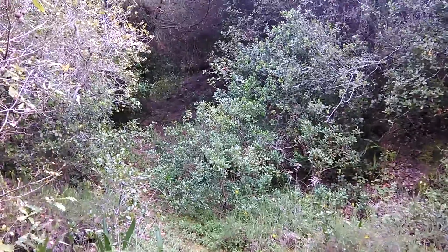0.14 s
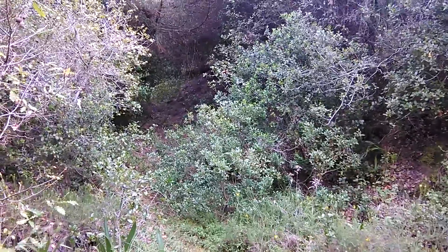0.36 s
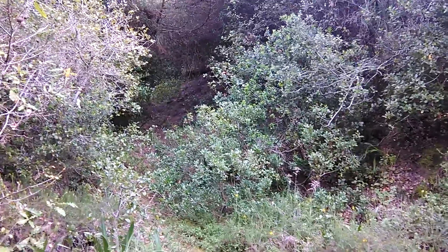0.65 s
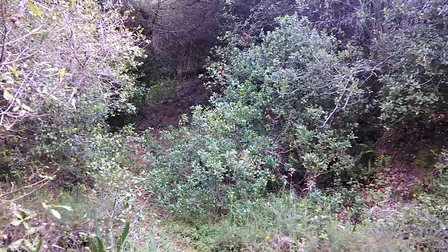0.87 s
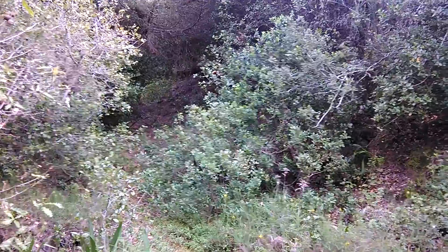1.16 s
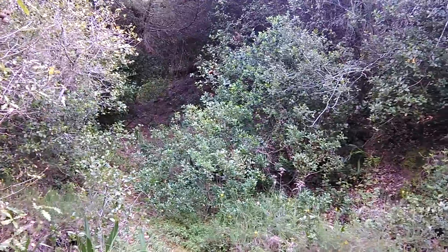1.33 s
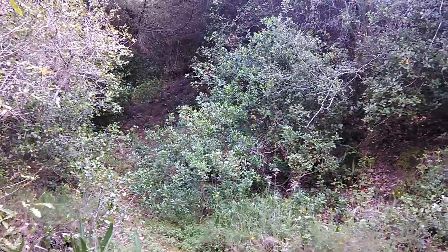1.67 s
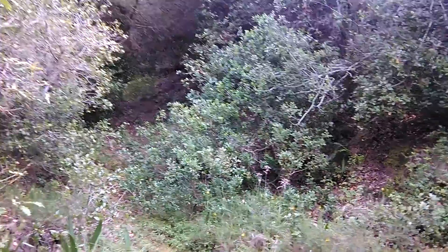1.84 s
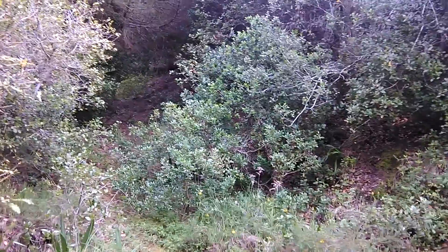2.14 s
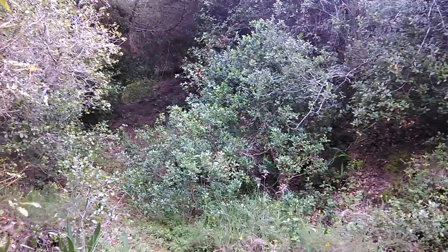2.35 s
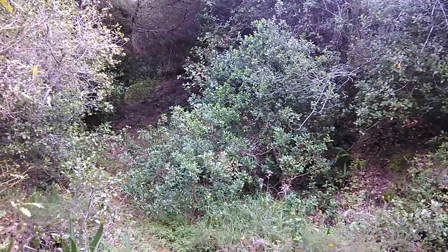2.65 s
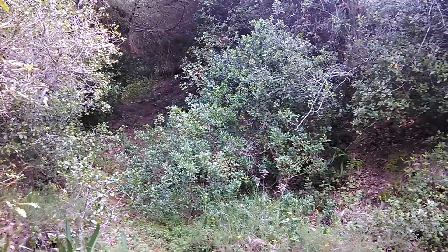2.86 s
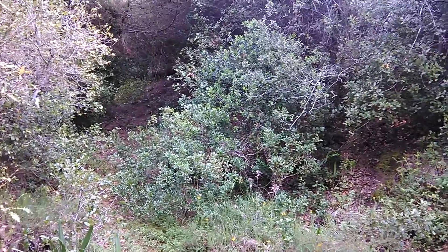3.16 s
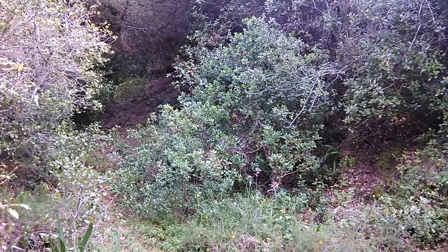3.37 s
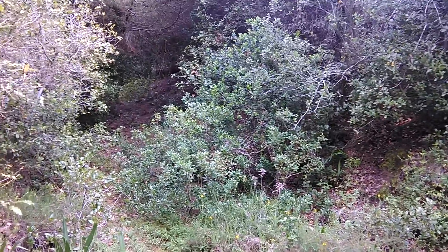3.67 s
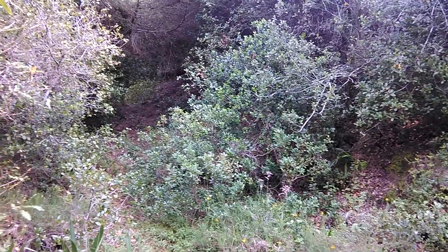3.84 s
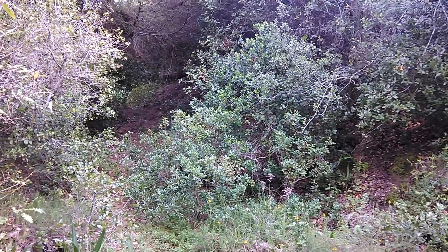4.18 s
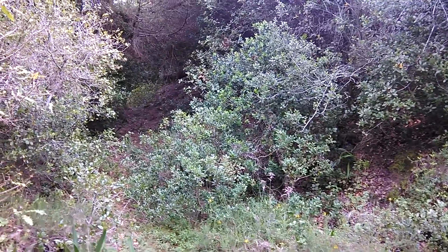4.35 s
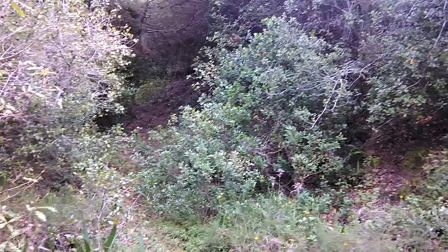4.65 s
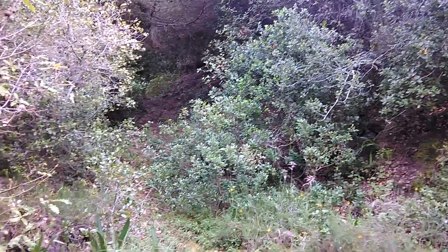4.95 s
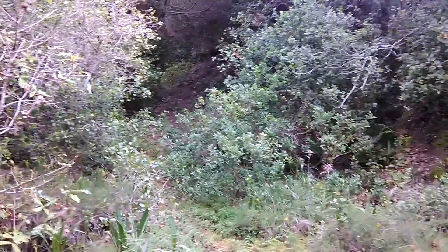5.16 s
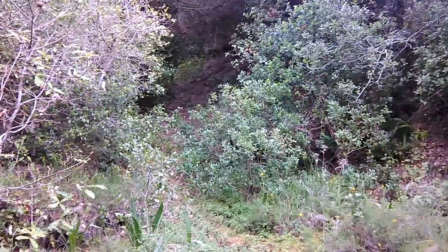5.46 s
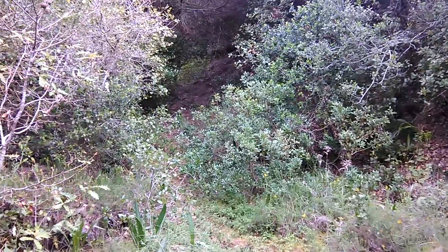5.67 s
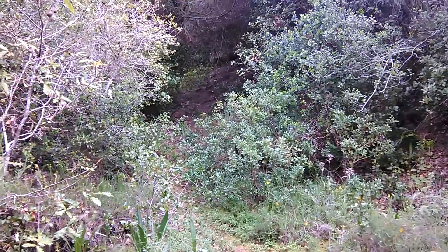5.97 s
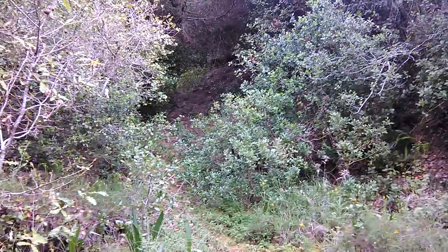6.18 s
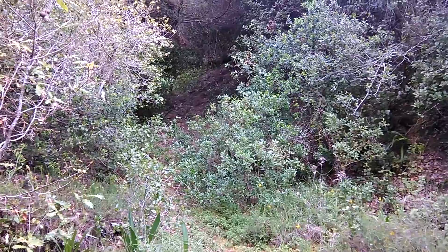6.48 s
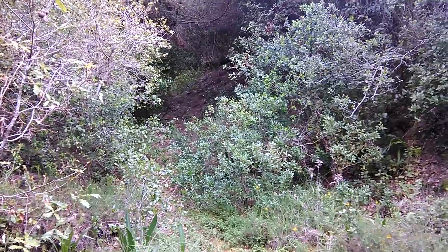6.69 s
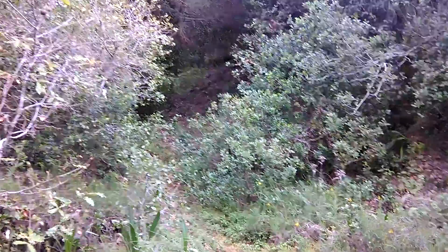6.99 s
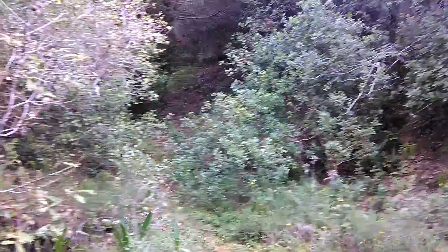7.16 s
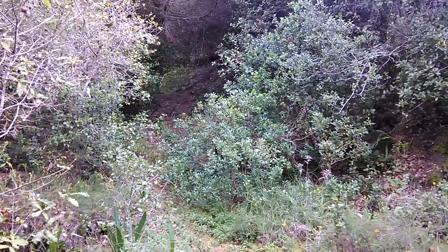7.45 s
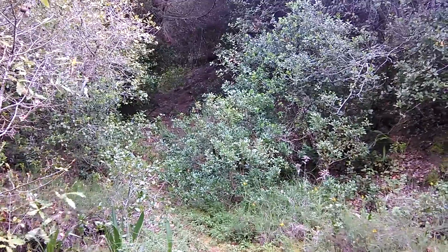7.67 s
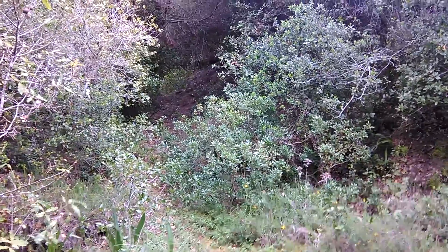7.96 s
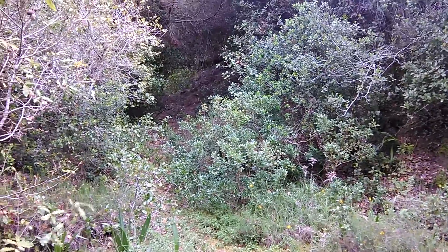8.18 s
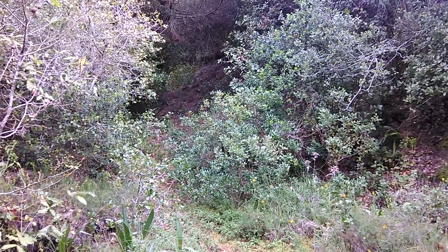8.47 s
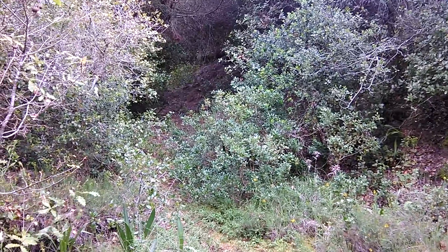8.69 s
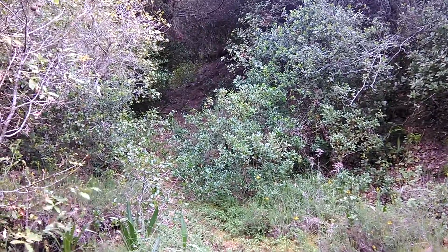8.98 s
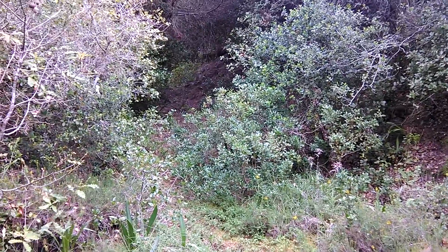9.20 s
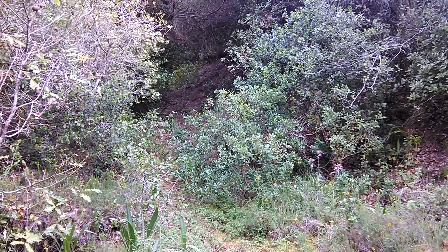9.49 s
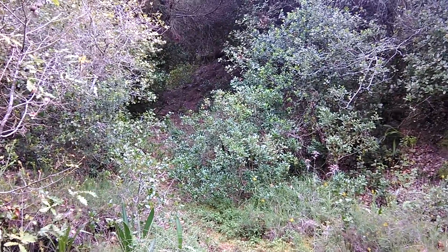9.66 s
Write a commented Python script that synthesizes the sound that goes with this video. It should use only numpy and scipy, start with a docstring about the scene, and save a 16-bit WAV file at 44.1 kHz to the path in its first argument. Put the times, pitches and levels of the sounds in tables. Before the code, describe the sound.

A quiet outdoor bed of low air rumble and faint dry-leaf hiss opens the scene, with a tiny twig tick at 0.2 s and one thin bird chirp near 0.8. Hounds start at 1.4 with a high yelp that cracks hoarse, more at 1.9, 2.4 and 2.7. From 3.2 to 5.2 short rough barks come quickly, dropping into low held tails, with yelps mixed in around 4.3 and 4.7. Barks continue in close pairs from 5.6 to 7.3, while leaves rustle nearer and twigs snap. Bushes and slope smear every call with a soft echo. Light wind bumps begin near 5.9; strong thumps arrive at 7.0 and crowd the microphone from 7.4 to 8.6, overloading dully beneath a yelp at 7.4 and barks at 7.7 and 8.2. Wind then drops, leaving clear high yelps at 8.9 and 9.3, a light rustle and fading echo until 9.8.

```python
"""Hounds call in scrub below a hillside: high yelps crack into rough half-tones, barks drop into a rasp,
and low held tails fade out behind them. Bushes and the slope scatter the calls back; one faint bird chirps.
Voices are oscillators that break into half-tones, phase jitter and noise, then pass a throat filter.
Close to the microphone, shaped noise makes leaf hiss, twig ticks and a breeze that swells into gusts;
damped low sines make the dull thumps that buffet the microphone and overload it."""
import sys
import numpy as np
from scipy import signal
from scipy.fft import rfft, irfft, next_fast_len
from scipy.io import wavfile
from scipy.ndimage import map_coordinates

SR = 44100
rng = np.random.default_rng(int(sys.argv[2]) if len(sys.argv) > 2 else 0)


def inscribe(sig):
    """Save sig as 16-bit PCM at rate SR to the path in sys.argv[1].

    A 1-D sig is mono; a 2-D sig holds one channel per row.
    Samples are clipped to [-1, 1] before scaling.
    """
    pcm = np.round(np.clip(np.atleast_2d(sig).T, -1, 1) * 32767)
    wavfile.write(sys.argv[1], SR, pcm.astype(np.int16))


N = 433503
TIME = np.arange(N) / SR


def undb(db):
    """Decibels to gain."""
    return 10 ** (np.asarray(db) / 20)


def unit(x):
    """Scale to rms 1."""
    return x / np.sqrt(np.mean(x ** 2) + 1e-18)


def curves(table):
    """Each column of a table joined by straight lines in time."""
    start_s, *columns = np.transpose(table)
    return [np.interp(TIME, start_s, column) for column in columns]


def colour(x, points):
    """Filter by (freq_hz, gain_db) points; the gain falls 9.5 dB per octave beyond the ends."""
    hz, db = np.transpose(points)
    size = next_fast_len(len(x) + 1024)
    octave = np.log2(np.maximum(np.fft.rfftfreq(size, 1 / SR), 1))
    outside = np.abs(octave - np.clip(octave, np.log2(hz[0]), np.log2(hz[-1])))
    gain = undb(np.interp(octave, np.log2(hz), db) - 9.5 * outside)
    return irfft(rfft(x, size) * gain, size)[:len(x)]


def band(x, hz, kind, order=2):
    """Causal low-, high- or band-pass."""
    sections = signal.butter(order, np.clip(hz, 1, .45 * SR), kind, fs=SR, output="sos")
    return signal.sosfilt(sections, x)


def wander(count, hz):
    """Smooth random curve through normal values of spread 1, drawn hz times a second."""
    place = np.arange(count) * hz / SR
    return map_coordinates(rng.standard_normal(int(place[-1]) + 3), [place], order=3, mode="nearest")


def burst(start_s, attack_s, length_s, release_s):
    """Envelope that rises over attack_s, holds until length_s after its start and dies away."""
    rise = np.clip((TIME - start_s) / attack_s, 0, 1)
    return rise * np.exp(-np.clip((TIME - start_s - length_s) / release_s, 0, 20))


def add(track, start_s, sound):
    """Mix a sound into a track at start_s."""
    start = max(int(start_s * SR), 0)
    track[start:start + len(sound)] += sound[:max(N - start, 0)]


# high yelps: start_s, length_s, crest_s (start to pitch crest), break_s (start to voice break),
# crest_hz, last_hz, level_db (once broken, before the swell), roughness (clipped to 0-1),
# brightness_db (tilt per octave around 1400 Hz), mouth_hz (resonance), upper_hz (throat resonance)
YELP_CALLS = [(1.384, 0.14, 0.043, 0.06, 1410, 1137, -32, 1.11, -3, 1100, 2680),
              (1.929, .105, 0.0192, 0.04, 1497, 1284, -35, 1.17, -1, 1800, 3030),
              (2.38, 0.15, 0.043, 0.036, 1353, 1195, -43, .55, -5, 1000, 2700),
              (2.707, .12, 0.06, 0.065, 1420, 1472, -37, 0.73, -3, 1600, 2850),
              (4.265, 0.077, 0.017, 0.011, 1490, 1189, -37, .7, 2, 1420, 3300),
              (4.683, 0.12, .023, 0.0045, 1597, 1230, -38, 0.89, 1, 1580, 3070),
              (7.417, .135, 0.0431, 0.0414, 1597, 1272, -31.5, 0.71, 2, 1920, 3230),
              (8.71, 0.037, 0.013, 0.063, 1475, 1447, -47.5, 0.1, 28, 2880, 2920),
              (8.854, 0.17, 0.043, 0.043, 1488, 1338, -35.5, 0.89, -2, 2050, 3270),
              (9.304, 0.16, .012, 0.0019, 1564, 1335, -34, 0.94, -3.5, 1830, 3250)]
# yelp throat as it carries through the bushes: freq_hz, gain_db
YELP_LOWER_THROAT = [(300, -62), (520, -13.5), (700, -7.5), (860, 0), (1150, 7.5), (1450, 3), (1800, 2),
                     (2080, 0), (2450, -2.5)]
# the throat's top end: multiple of upper_hz, gain_db
YELP_UPPER_THROAT = [(1, 3), (1.08, -7), (1.2, -20), (1.5, -16.5), (1.85, -23), (2.4, -33)]
YELP_RISE_HZ_PER_S = 3665  # mean climb to the crest


def yelps():
    """Folds pulled tight: the pitch climbs to a crest and stays high as the voice breaks."""
    out = np.zeros(N)
    for start_s, length_s, crest_s, break_s, crest_hz, *rest, upper_hz in YELP_CALLS:
        first_hz = crest_hz - YELP_RISE_HZ_PER_S * crest_s
        row = (length_s, crest_s, break_s, first_hz, crest_hz, *rest)
        throat = list(YELP_LOWER_THROAT) + [(ratio * upper_hz, db) for ratio, db in YELP_UPPER_THROAT]
        yelp = call(row, throat, fall=.8, slope_db=-3, pure_db=-3, half_db=-4, rasp_db=-11, jitter=.052,
                    attack_s=0.042, release_s=0.043, head_db=1.5, rasp_lag_s=0.0066)
        add(out, start_s, yelp)
    return out


# barks: start_s, length_s, hold_s (start to pitch_hz), break_s (start to voice break), pitch_hz,
# level_db (once broken, before the swell), roughness (clipped to 0-1),
# brightness_db (tilt per octave around 1400 Hz), mouth_hz (resonance)
BARK_CALLS = [(3.164, .135, 0.0048, 0.0099, 1290, -37.5, 1.01, 1, 1710),
              (3.538, 0.11, 0.0052, 0.0089, 1303, -38, 0.89, 1, 1620),
              (3.768, .13, 0.018, 0.0082, 919, -45.5, 0.97, -4.5, 1720),
              (4.026, .13, 0.0049, 0.014, 1283, -37.5, 0.81, 0.5, 1300),
              (4.250, 0.15, 0.032, 0.047, 985, -42.5, 0.75, -2, 1230),
              (4.677, 0.068, .02, 0.011, 904, -49, 0.88, -6, 1000),
              (4.769, .13, 0.0056, 0.0073, 750, -40.5, 1.15, 1.5, 1720),
              (5.101, .12, .018, 0.023, 1002, -35, 0.79, 0.5, 1480),
              (5.592, 0.098, 0.0065, 0.02, 1031, -37.5, 0.7, -1, 2020),
              (5.664, 0.084, 0.0067, .005, 832, -36.5, 0.9, 1.5, 1930),
              (6.073, .11, .005, 0.042, 923, -39, 1, -1, 1980),
              (6.182, 0.072, 0.00704, 0.015, 1021, -35.5, .65, -5, 1930),
              (6.522, 0.083, 0.0051, 0.0067, 899, -41.5, 0.75, 2.5, 1870),
              (6.643, .115, .03, 0.026, 926, -35, 0.61, -3.5, 2110),
              (6.904, .15, 0.019, 0.0094, 984.6, -35.5, 0.79, -2.5, 1060),
              (7.31, .097, 0.0038, 0.0033, 883, -41, 0.68, 4.5, 1720),
              (7.741, 0.087, 0.0072, 0.015, 902, -35, 0.62, 7.5, 1690),
              (8.225, .085, 0.0074, .006, 993, -35, 0.62, 3.5, 1670),
              (8.694, 0.032, 0.0099, 0.025, 1026, -50.5, 0.25, -11, 1020)]
# bark throat as it carries through the bushes: freq_hz, gain_db
BARK_THROAT_COLOUR = [(300, -79), (470, -7.5), (600, 1), (800, 2), (1120, 7), (1400, 1.5), (1700, 5),
                      (2000, 2.5), (2350, 4.5), (2700, -3.5), (3150, -7.5), (3800, -24.5), (4800, -18),
                      (8000, -53)]
BARK_START_RATIO, BARK_END_HZ = 1.04, 575.4  # every bark starts a little sharp, drops to one low note


def barks():
    """Folds that slacken at once: the pitch drops quickly into a low rasp."""
    out = np.zeros(N)
    for start_s, length_s, hold_s, break_s, pitch_hz, *rest in BARK_CALLS:
        row = (length_s, hold_s, break_s, BARK_START_RATIO * pitch_hz, pitch_hz, BARK_END_HZ, *rest)
        # the longer the clean head holds before it breaks, the louder it is
        head_db = np.interp(break_s, [.005, .025], [-4, 5])
        bark = call(row, BARK_THROAT_COLOUR, fall=1.8, slope_db=-3.5, pure_db=-4, half_db=-5, rasp_db=-13,
                    jitter=.056, attack_s=0.014, release_s=0.023, head_db=head_db, rasp_lag_s=0.00091)
        add(out, start_s, bark)
    return out


def call(row, throat, fall, slope_db, pure_db, half_db, rasp_db, jitter,
         attack_s, release_s, head_db, rasp_lag_s):
    """One call: the folds start on a nearly pure tone, then break into doubled periods and chaos."""
    length_s, crest_s, break_s, first_hz, crest_hz, last_hz, db, rough, bright_db, mouth_hz = row
    rough = np.clip(rough, 0, 1)
    t = np.arange(int((length_s + release_s) * SR)) / SR
    count = len(t)

    to_crest = first_hz + (crest_hz - first_hz) * np.sin(np.pi / 2 * np.minimum(t / crest_s, 1))
    left = np.clip((length_s - t) / max(length_s - crest_s, .01), 0, 1)
    from_crest = last_hz + (crest_hz - last_hz) * left ** fall
    hz = np.where(t < crest_s, to_crest, from_crest)

    # half-tones enter around the break, chaos a little after
    doubled = np.clip((t - break_s) / .014 + .5, 0, 1)
    broken = np.clip((t - break_s - rasp_lag_s) / .025 + .5, 0, 1)
    clean = 1 - broken
    chaos = rough * broken
    hz = hz * (1 + .014 * wander(count, 130) + jitter * chaos * wander(count, 350))
    phase = 2 * np.pi * np.cumsum(hz) / SR

    tone, halves = 0, 0
    for k in range(1, 8):
        # overtones grow as the folds start to slap shut
        size = undb(slope_db * np.log2(k) + pure_db * clean * (k - 1) ** 2)
        flutter = undb(3 * wander(count, 80)) * (1 + .5 * chaos * wander(count, 250))
        tone = tone + size * flutter * np.sin(k * phase)
        # the half-tones lock only loosely to the main cycle
        slip = 1.3 * chaos * wander(count, 140)
        halves = halves + size * (1 + .6 * wander(count, 110)) * np.sin((k - .5) * phase + slip)

    # breath noise pulses with the folds
    rasp = unit(band(rng.standard_normal(count), 1600, "low", order=1))
    rasp *= (1 + .5 * np.cos(phase)) * undb(2.5 * wander(count, 300))
    folds = tone * (1 - .65 * chaos)
    folds = folds + rough * doubled * undb(half_db) * halves
    folds = folds + chaos * undb(rasp_db) * rasp
    mouth = band(folds, [mouth_hz / 1.136, mouth_hz * 1.085], "band", order=1)
    folds = folds + 1.73 * broken * mouth

    tilted = [(f, d + bright_db * np.clip(np.log2(f / 1400), -1, 1)) for f, d in throat]
    voice = colour(folds, tilted)
    rise = np.sin(np.pi / 2 * np.minimum(t / attack_s, 1)) ** 2
    close = np.clip((length_s + release_s - t) / (2 * release_s), 0, 1) ** 2
    return unit(voice) * rise * close * undb(db + head_db * clean)


# low held tails, most near 570 Hz: start_s, length_s, pitch_hz, level_db (before swell and fade)
LOW_TAILS = [(1.713, 0.12, 1003, -50.5), (2.4, 0.17, 575, -46.5), (2.721, 0.097, 520, -52.5),
             (3.204, 0.17, 600, -45.5), (3.605, 0.094, 606, -52.5), (3.809, 0.15, 581, -50.5),
             (4.099, 0.12, 587, -50), (4.326, 0.085, 598, -41.5), (4.789, 0.12, 558, -41.5),
             (5.155, 0.2, 562.4, -37.5), (5.698, 0.18, 568, -38.5), (6.235, 0.15, 552.7, -40.5),
             (6.55, 0.093, 592, -37.5), (6.697, 0.059, 560, -34.5), (6.968, 0.16, 563, -41.5),
             (7.343, 0.092, 577, -35.5), (7.791, 0.073, 565, -41.5), (8.267, 0.087, 544.4, -34.5)]


def held_tails():
    """Low held tails, most near 570 Hz, where a bark's falling pitch settles and fades."""
    out = np.zeros(N)
    for start_s, length_s, pitch_hz, db in LOW_TAILS:
        tail = held_tail(length_s, pitch_hz, db, sag=.031, waver=0.014, attack_s=0.019, fade_db=10.0)
        add(out, start_s, tail)
    return out


# throat colour of the low tails: freq_hz, gain_db
TAIL_THROAT_COLOUR = [(400, 5.5), (580, 18), (1150, 13.5), (1730, -7), (2320, -2.5), (2900, -23),
                      (3500, -26), (5000, -50)]


def held_tail(length_s, hz, db, sag, waver, attack_s, fade_db):
    """One held tail: overtones on a pitch that sags a little, fading with a hoarse waver."""
    t = np.arange(int((length_s + .03) * SR)) / SR
    count = len(t)
    pitch = hz * (1 + sag * (.5 - t / length_s) + waver * wander(count, 160))
    phase = 2 * np.pi * np.cumsum(pitch) / SR
    tone = 0
    for k in range(1, 8):
        flutter = undb(4.5 * wander(count, 60))
        tone = tone + flutter * np.sin(k * phase + .7 * wander(count, 110))
    swell = np.minimum(t / attack_s, 1) * np.minimum((t[-1] - t) / 0.048, 1)
    fade = undb(-fade_db * t / length_s)
    return unit(colour(tone, TAIL_THROAT_COLOUR)) * swell * fade * undb(db)


def hillside(x, near_db, near_t60, far_db, far_t60, echo_s, echo_db):
    """Nearby bushes scatter sound within milliseconds; the slope returns a soft echo and a dull tail."""
    t = np.arange(int(1.2 * SR)) / SR
    # sparse random reflections
    scatter = rng.standard_normal((3, len(t))) * (rng.random((3, len(t))) < .05)
    near = unit(scatter[0] * undb(-60 * t / near_t60) * (t > .004))
    far = unit(scatter[1] * undb(-60 * t / far_t60) * np.minimum(t / .08, 1))
    echo = unit(scatter[2] * np.exp(-np.abs(t - echo_s) / .012))
    slope = band(undb(far_db) * far + undb(echo_db) * echo, 2700, "low")
    response = undb(near_db) * near + slope
    return x + signal.fftconvolve(x, response / np.sqrt(len(t)))[:N]


# large eddies at the microphone: freq_hz, gain_db
LARGE_EDDY_COLOUR = [(15, -60), (25, -37), (48, 5.5), (75, 7.5), (118, 4), (230, -6.5), (400, -42.5),
                     (520, -67.5)]
# small eddies at the microphone: freq_hz, gain_db
SMALL_EDDY_COLOUR = [(200, 1.5), (330, 1.5), (550, -11), (1000, -29.5), (2000, -51), (6000, -58)]
# light breeze on the microphone: start_s, level_db
BREEZE_LEVEL = [(0, -51.5), (.6, -49.5), (1.3, -58), (2.9, -67), (3.6, -50.5), (4.1, -68), (5.6, -65),
                (6.0, -44), (6.3, -40), (6.6, -53.5), (7.0, -37.5), (7.38, -31.5), (7.5, -29.5),
                (8.25, -23), (8.8, -40.5), (9.2, -42.5), (9.5, -39), (9.83, -59)]
# gusts on top of it: start_s, length_s, level_db, eddy_db (small eddies relative to the large)
GUST_EVENTS = [(5.891, .035, -35, -35), (6.112, 0.082, -30.5, -24), (6.351, 0.039, -41.5, -31),
               (6.808, 0.029, -23.5, -42), (7.011, 0.065, -20.5, -22), (7.119, 0.15, -24.5, -27),
               (7.439, 0.044, -22, -14), (7.479, 0.078, -14.5, -7.5), (7.546, 0.047, -12.5, -4),
               (7.626, 0.063, -12.5, -4), (7.705, 0.05, -15.5, -9.5), (7.771, 0.026, -11, -8),
               (7.839, 0.071, -19.5, -10.5), (8.008, 0.046, -18, -8.5), (8.139, 0.078, -19, -21),
               (8.389, 0.11, -17, -3.5), (8.536, 0.093, -15.5, -9), (8.851, 0.018, -27, -33),
               (9.056, .045, -35.5, -40)]
GUST_ATTACK_S, GUST_RELEASE_S = 0.0081, 0.022
BREEZE_TOP_HZ = 84.5  # slow air sheds only large eddies


def wind():
    """Large eddies rumble on the microphone, swelling in short gusts; small ones ride on their peaks."""
    rumble = unit(band(colour(rng.standard_normal(N), LARGE_EDDY_COLOUR), 44.0, "high"))
    large = unit(np.tanh(0.38 * rumble))
    small = unit(colour(rng.standard_normal(N) * large ** 2, SMALL_EDDY_COLOUR))
    breeze_db, = curves(BREEZE_LEVEL)
    out = undb(breeze_db) * unit(band(large, BREEZE_TOP_HZ, "low", order=3))
    for start_s, length_s, db, eddy_db in GUST_EVENTS:
        gust = undb(db) * (large + undb(eddy_db) * small)
        out = out + burst(start_s, GUST_ATTACK_S, length_s, GUST_RELEASE_S) * gust
    return out


# single buffets: start_s, level_db (relative), bright_db (knock level, relative)
BUFFETS = [(5.904, -39, -13), (6.823, -30, -45), (7.048, -5.5, -36), (7.223, -9.5, -43), (7.499, -3, -23),
           (7.561, 1.5, -16), (7.587, 1.5, -16.5), (7.635, 0.5, -24.5), (7.671, 6.5, -21), (7.725, 0, -51),
           (7.792, -1.5, -12.5), (7.848, -4, -19.5), (7.864, -9.5, -16), (7.905, -3.5, -48),
           (8.013, -3.5, -54), (8.326, 1, -34), (8.408, -10, -7), (8.441, -6.5, -14), (8.449, 0, -20),
           (8.488, -14.5, -13), (8.546, 0, -22), (8.582, -15.5, -29), (8.619, -7.5, -21.5)]
THUMP_SCATTER = .13  # spread of swing and knock pitch between buffets (share)


def thumps(ring_hz, ring_s, crack_hz, crack_s, level_db, crack_db):
    """Each buffet kicks the diaphragm: a damped low swing and, when sharp, a short knock."""
    out = np.zeros(N)
    t = np.arange(int(.06 * SR)) / SR
    chances = np.exp(THUMP_SCATTER * rng.standard_normal((len(BUFFETS), 2)))
    for (start_s, db, bright_db), (swing_ratio, knock_ratio) in zip(BUFFETS, chances):
        swing = np.sin(2 * np.pi * ring_hz * swing_ratio * t) * np.exp(-t / ring_s)
        swing = band(swing, 450, "low")
        knock = np.exp(-t / crack_s) * np.sin(2 * np.pi * crack_hz * knock_ratio * t)
        # harder buffets have steeper fronts
        knock = band(knock, 500 + 1800 * undb(db), "low")
        add(out, start_s, undb(db + level_db) * (swing + undb(bright_db + crack_db) * knock))
    return out


# steady stir of dry leaves close by: start_s, level_db (before its slow wander)
LEAF_STIR = [(0, -74), (1.2, -77), (2.2, -71), (3.15, -71.5), (3.6, -59.5), (7.0, -59), (8.6, -60.5),
             (9.05, -66), (9.4, -58), (9.65, -71.5), (9.83, -66.5)]
# colour of the leaf hiss: freq_hz, gain_db
LEAF_HISS_COLOUR = [(2350, -6), (4000, -10), (4650, -6.5), (6400, -8.5), (8260, 0), (10500, 0),
                    (14100, -5.5), (15200, -10.5), (16000, -21)]
# branches brushed aside: start_s, level_db
BRANCH_RUSTLES = [(.23, -68), (1.32, -66.5), (1.70, -67.5), (1.97, -63.5), (2.33, -64.5), (4.07, -55),
                  (4.81, -58), (5.6, -57), (6.68, -52.5), (9.44, -64)]
RUSTLE_ATTACK_S, RUSTLE_DECAY_S = 0.022, 0.096


def leaves():
    """Dry foliage: fine restless noise that stirs steadily, with rustles that rise fast and die away."""
    db, = curves(LEAF_STIR)
    stir = undb(db + 0.83 * wander(N, 12))
    rustle_power = 0
    for start_s, level_db in BRANCH_RUSTLES:
        rustle = undb(level_db) * burst(start_s, RUSTLE_ATTACK_S, RUSTLE_ATTACK_S, RUSTLE_DECAY_S)
        rustle_power = rustle_power + rustle ** 2
    flicker = undb(1.8 * wander(N, 44) + 1.18 * wander(N, 750))
    hiss = unit(colour(rng.standard_normal(N) * flicker, LEAF_HISS_COLOUR))
    return hiss * np.sqrt(stir ** 2 + rustle_power)


# twig snaps close by: start_s, level_db (relative)
TWIG_SNAPS = [(0.2289, -62), (2.3225, -32.5), (4.4363, -36), (4.8359, -36), (5.3863, -33), (5.639, -32.5),
              (5.909, -36.5), (6.143, -36), (7.8987, -32.5), (8.841, -39), (9.192, -38), (9.459, -34.5),
              (9.702, -46), (9.752, -40)]


def twigs():
    """Each snap is a noise burst: a very short crack with a weaker, longer tail."""
    snaps = np.zeros(N)
    t = np.arange(int(.08 * SR)) / SR
    decay = np.exp(-t / 0.002) + 0.3 * np.exp(-t / 0.031)
    for start_s, db in TWIG_SNAPS:
        add(snaps, start_s, undb(db - 7.5) * rng.standard_normal(len(t)) * decay)
    return colour(snaps, [(2000, -5), (6000, -13), (9000, 1.0), (15000, 1.0)])


def bird(start_s, hz, db):
    """One thin, faint chirp: a sine that slides down."""
    out = np.zeros(N)
    t = np.arange(int(.06 * SR)) / SR
    phase = 2 * np.pi * np.cumsum(hz * np.exp(-t)) / SR
    add(out, start_s, undb(db) * np.hanning(len(t)) * np.sin(phase))
    return out


# colour of the open air: freq_hz, gain_db
AIR_COLOUR = [(21, -50), (35, -4), (65, -1), (110, -20.5), (177, -18.5), (281, -15.5), (683, -21),
              (746, -17.5), (1190, -26.5), (1450, -29), (2110, -35), (3370, -46), (4700, -48), (7000, -63),
              (9100, -100)]
# level of the open air: start_s, level_db (before its slow wander)
AIR_LEVEL_CURVE = [(0, -53.5), (1.2, -51.5), (3, -53), (6, -52.5), (8.8, -57), (9.83, -58.5)]


def air():
    """Low outdoor rumble and a faint breeze over the valley: shaped noise whose level wanders."""
    rumble = unit(colour(rng.standard_normal(N), AIR_COLOUR))
    db, = curves(AIR_LEVEL_CURVE)
    return rumble * undb(db + 0.89 * wander(N, 7))


def scene():
    """Hounds and a bird in the scrub, foliage and wind close by."""
    voices = yelps() + barks() + held_tails() + bird(start_s=0.81, hz=4820, db=-71)
    animals = hillside(voices, near_db=-1, near_t60=0.2, far_db=-9.5, far_t60=0.54,
                       echo_s=0.1563, echo_db=-22)
    buffets = thumps(ring_hz=139.2, ring_s=0.0042, crack_hz=398, crack_s=0.0013, level_db=4, crack_db=17.5)
    return (animals + wind() + buffets + leaves() + twigs() + air())[None]


TOP_HZ = 15850  # upper limit of the microphone


def record(dry):
    """The microphone sheds the deepest bass, rounds off the peaks that overload it and cuts the top."""
    drive = np.clip(band(dry, 42, "high", order=4), -1.5, 1.5)
    # the cubic flattens out at full scale
    rounded = drive - 4 / 27 * drive ** 3
    return signal.sosfilt(signal.ellip(8, .2, 70, TOP_HZ, fs=SR, output="sos"), rounded)


dry = scene()
out = record(dry)
inscribe(out)
```